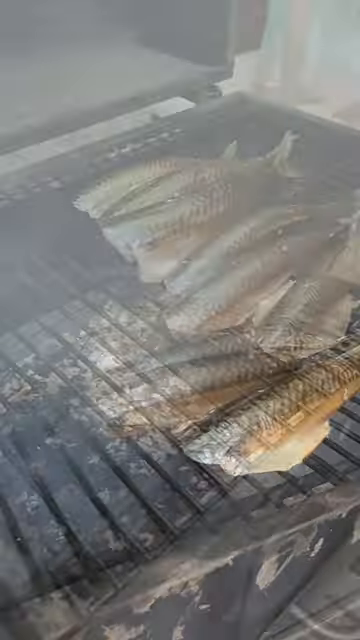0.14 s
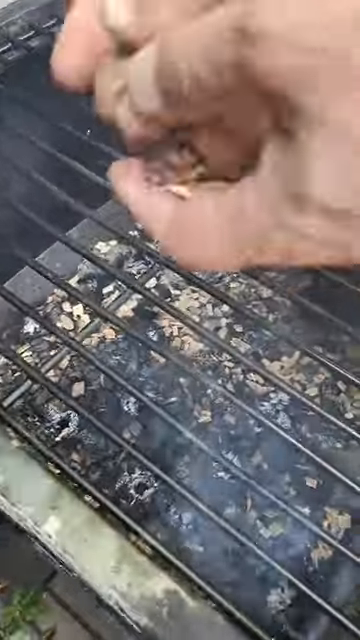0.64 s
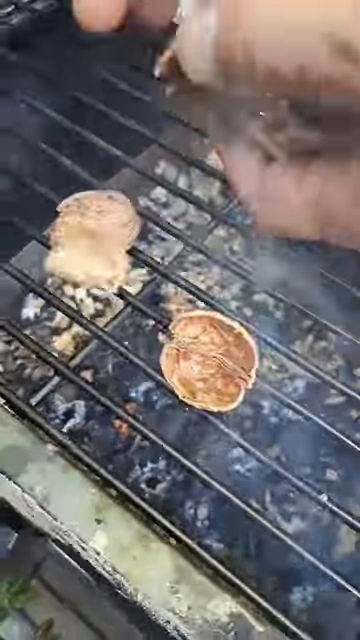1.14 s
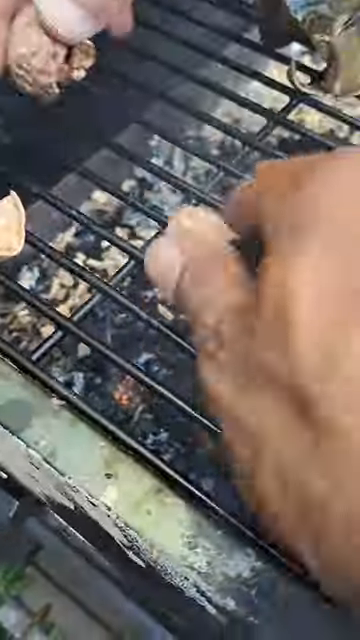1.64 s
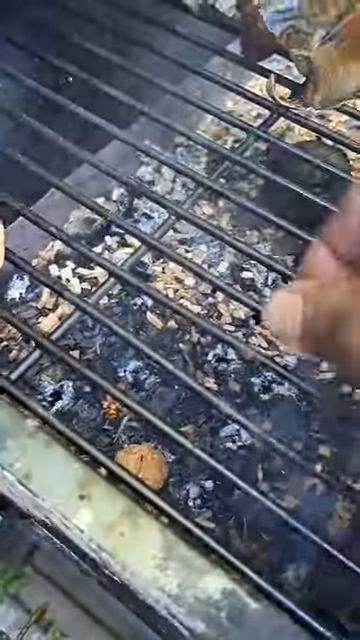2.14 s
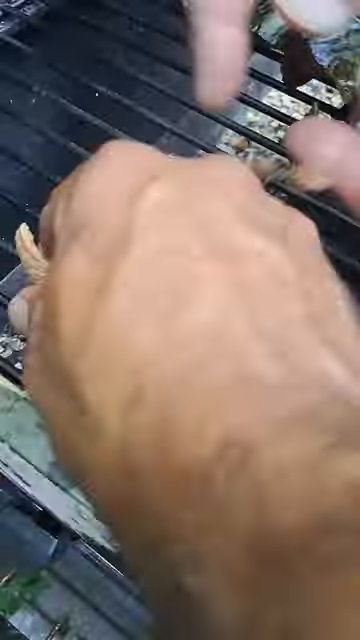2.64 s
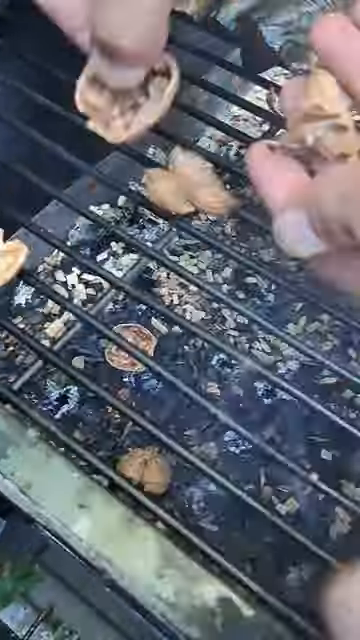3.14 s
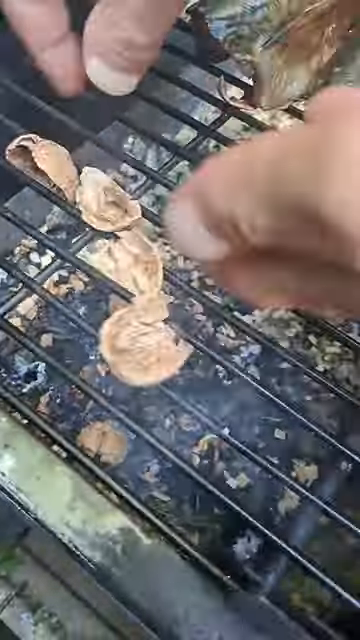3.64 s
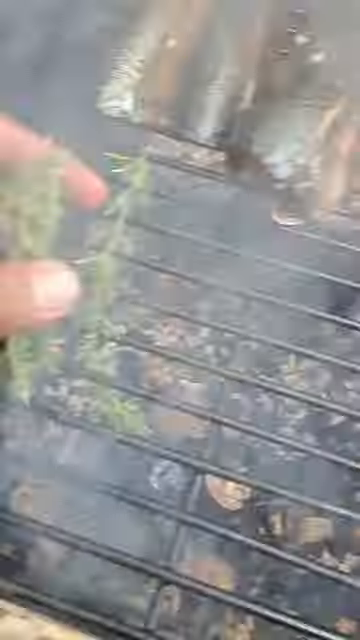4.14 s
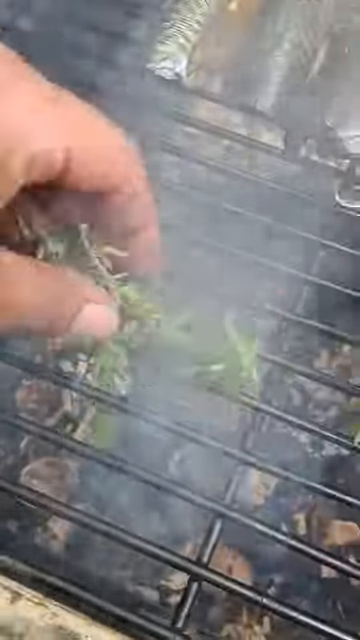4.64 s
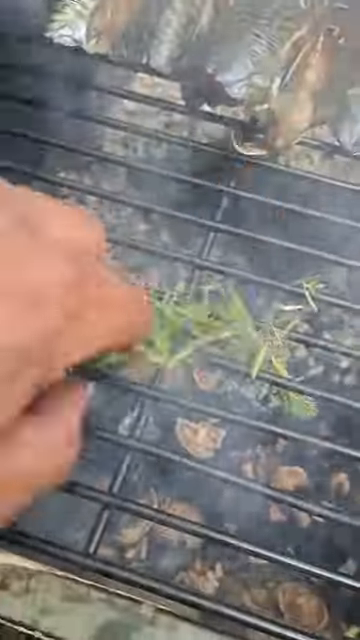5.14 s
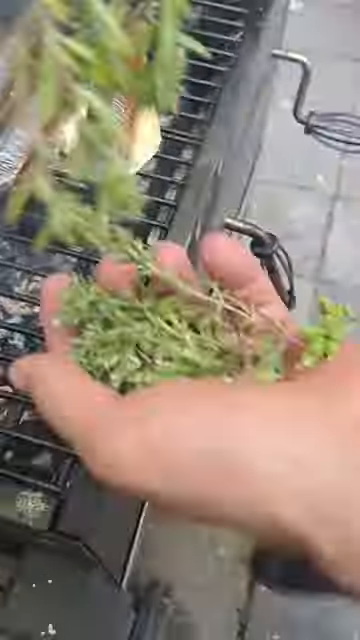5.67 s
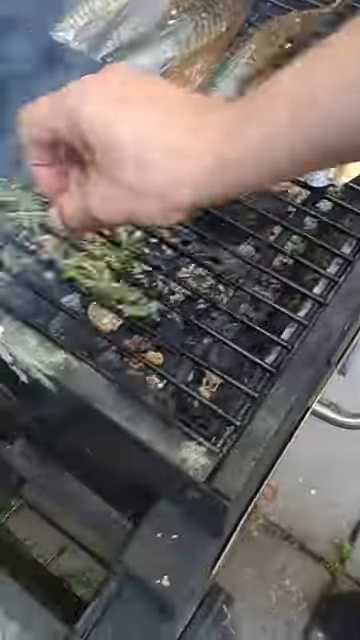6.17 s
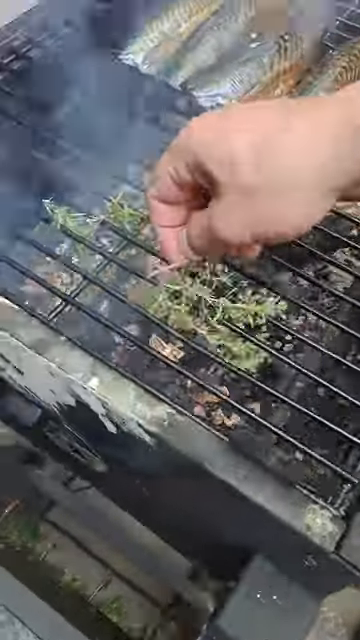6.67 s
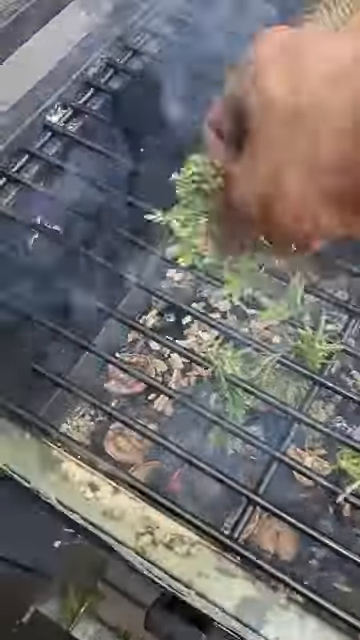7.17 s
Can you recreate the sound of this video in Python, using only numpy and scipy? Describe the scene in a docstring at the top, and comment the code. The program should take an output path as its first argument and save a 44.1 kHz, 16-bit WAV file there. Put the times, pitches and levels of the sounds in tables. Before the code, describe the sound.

Walnut shells clack and scrape sharply on a steel grill grate, with microphone bumps, then soft herb rustles over low distant traffic rumble.

```python
"""Outdoors at a smoker, hands drop and shuffle walnut shells, then herb sprigs, on the steel grate close to a phone.
Shells clack as short tones and noise puffs; friction scrapes and rustles as filtered noise; resonant bars ring.
The firebox thuds on two sines, and a finger rubs the right microphone port with pressure pulses and skin noise.
Far traffic rumbles as slowly swelling noise, and a bird chirps faintly with wavering tones."""
import sys
import numpy as np
from scipy import signal
from scipy.fft import rfft, irfft, next_fast_len
from scipy.io import wavfile
from scipy.ndimage import map_coordinates

SR = 44100
rng = np.random.default_rng(int(sys.argv[2]) if len(sys.argv) > 2 else 0)


def invert_db(x):
    """Field ratio 10**(x/20) for x, a level in decibels (scalar or array-like)."""
    u = np.asarray(x, float) / 20
    return 10 ** u


def digitize_waveform(pressure):
    """Quantize a signal to 16-bit integers and store it at the path in sys.argv[1].

    Rows of a 2-D input are taken as channels; values are limited to [-1, 1].
    """
    field = np.atleast_2d(pressure).T
    bounded = np.clip(field, -1, 1)
    quanta = np.round(bounded * 32767).astype(np.int16)
    wavfile.write(sys.argv[1], SR, quanta)


N = 321489

# Where the hands are. Each row: time in seconds, left-over-right balance of the scrape in dB
# before each layer takes its share, left-over-right balance of the rustle in dB.
HANDS = [(0, -21.5, -9), (.3, -10, 2.5), (.48, 13, 16.5), (.55, 43, 44), (1.09, 66.5, 47),
         (1.2, -10.5, 20.5), (1.36, 25, 31), (1.93, 23.5, 41), (2.2, -2, 22.5), (3.65, -6, 13),
         (4.2, -6, 1.5), (5.6, 1.5, -1.5), (6.12, -15.5, -29), (6.35, -3.5, -3), (6.8, -5, -13.5),
         (7.29, -6.5, -2)]
# The grate bars. Each row: resonance in Hz, relative level in dB, ring time in seconds.
BARS = [(760, -5, .09), (1190, -4, .09), (1690, -6, .08), (2075, 0, .11), (2320, -4, .08), (2560, -1, .1),
        (2680, -5, .07), (3700, -6, .07), (4180, -2, .09), (4440, -7, .07), (4740, -5, .07),
        (5240, -3, .07), (5560, -2, .07), (5900, -6, .06)]
# How firmly the dragged things touch the bars. Each row: time in seconds, contact in dB.
CONTACT = [(0, -8), (1.5, -10), (1.95, 10), (2.5, 10), (2.6, 6), (2.95, 8), (3.8, 8), (4.25, 6), (4.5, -8),
           (7.29, -8)]
# Colours of the friction: low drone, scrape, chafe of shells, rustle of shells.
# Each row: frequency in Hz, relative level in dB per Hz.
DRONE = [(150, -29), (250, 4), (500, 1.5), (1200, 2), (1800, -7.5), (2500, -47)]
SCRAPE = [(900, -37), (1500, -8), (2200, -4), (2800, -7), (3150, -8), (3800, -10), (5000, -35.5)]
CHAFE = [(2500, -38.5), (3300, -10.5), (3900, -2), (4900, 2.5), (5500, 2.5), (6200, -6), (7200, -25.5),
         (9000, -41.5)]
RUSTLE = [(4000, -41), (6000, -5), (7000, -2.5), (9000, -4.5), (10800, -1), (12000, -1.5), (13500, -4),
          (15500, -5.5), (16100, -31), (17500, -59.5)]


def unit(x):
    """Scaled to rms 1."""
    return x / np.sqrt(np.mean(x ** 2, -1, keepdims=True) + 1e-20)


def curves(rows, t=None):
    """Each column after the time, read at every sample or at times t."""
    s, *cols = np.transpose(rows)
    return [np.interp(np.arange(N) / SR if t is None else t, s, c) for c in cols]


def wobble(rate):
    """A smooth random curve, rate knots a second."""
    return map_coordinates(rng.standard_normal(int(N * rate / SR) + 4), [np.arange(N) * rate / SR])


def filtered(x, response):
    """x times a complex response of frequency."""
    m = next_fast_len(x.shape[-1] + 8192)
    return irfft(rfft(x, m) * response(np.fft.rfftfreq(m, 1 / SR)), m)[..., :x.shape[-1]]


def along(points):
    """(Hz, value) points as a function on a log axis."""
    f, v = np.transpose(points)
    return lambda hz: np.interp(np.log(hz + 1), np.log(f + 1), v)


def coloured(x, spectrum):
    """x through a (Hz, dB) spectrum, at rms 1."""
    return unit(filtered(x, lambda hz: invert_db(along(spectrum)(hz))))


def sides(pan_db):
    """Left and right gains that differ by pan_db and keep the summed power."""
    return 2 / np.sqrt(1 + invert_db(2 * np.array([-pan_db, pan_db])))


def pair(n, shared=0.3):
    """Noise for the two ports, part of it common to both."""
    common, *own = rng.standard_normal((3, n))
    share = np.clip(shared, 0, 1)
    return np.sqrt(share) * common + np.sqrt(1 - share) * np.array(own)


def traffic():
    """Far traffic: low rumble and higher hush swell slowly; the ports share the lows more than the highs."""
    # Traffic swell. Each row: time in seconds, rumble level in dB before the layer's trim.
    swell = [(0, -58), (.28, -69), (.5, -63.5), (.7, -52), (1.4, -53), (2.2, -55.5), (3.1, -56), (3.5, -51),
             (3.9, -59), (4.8, -56), (6.3, -54), (7.29, -58)]
    # Colours of rumble and hush. Each row: frequency in Hz, relative level in dB per Hz.
    rumble_colour = [(12, -40.5), (20, -22), (40, -7), (59, 4), (98, -14), (157, -14), (216, -16),
                     (300, -21), (390, -48.5), (660, -120)]
    hush_colour = [(88, -27), (150, -1.5), (231, -8), (264, -30), (309, -9), (383, -8.5), (888, -19),
                   (1340, -17.5), (2700, -42.5), (12400, -48), (16000, -55)]
    # Left-right likeness. Each row: frequency in Hz, likeness from 0 to 1.
    alike = [(60, 0.9), (150, 1), (380, 0.82), (950, .1), (16000, .1)]
    rumble_db, = curves(swell)
    hush_db = -60.5 + 0.56 * (rumble_db - rumble_db.mean())  # the hush follows part of the swell

    def turn(hz):
        return np.arccos(np.clip(along(alike)(hz), 0, 1)) / 2

    layers = []
    for spectrum in rumble_colour, hush_colour:
        mid, side = filtered(
            rng.standard_normal((2, N)),
            lambda hz: invert_db(along(spectrum)(hz)) * [np.cos(turn(hz)), np.sin(turn(hz))])
        layers.append(np.array([mid + side, mid - side]) / mid.std())
    rumble = invert_db(rumble_db + 5.0 + 1.2 * wobble(5.6)) * layers[0]
    hush = invert_db(hush_db - 3.5 + 0.98 * wobble(2.3) + 0.55 * wobble(19)) * layers[1]
    return (rumble + hush) * invert_db([[-1.2], [1.2]])


def bird():
    """Hoarse, distant notes: a wavering, rough line and a weaker one above, blurred by distance."""
    # Notes. Each row: start in seconds, length scale in seconds, centre pitch in Hz,
    # level in dB before the trim.
    notes = [(4.296, 0.087, 3050, -71), (4.408, 0.072, 3015, -70), (4.571, 0.11, 3180, -68.5),
             (4.669, 0.09, 3090, -72), (4.828, 0.042, 3040, -73.5), (5.165, 0.14, 3110, -66),
             (5.359, 0.037, 2530, -66)]
    t, out = np.arange(N) / SR, np.zeros((2, N))
    waver, rasp = wobble(220), invert_db(5 * wobble(250))
    for s, length, hz, db in notes:
        part = slice(round(s * SR), round((s + 3 * length) * SR))
        u = (t[part] - s) / length
        phase = 2 * np.pi * np.cumsum(hz * (1 + .035 * waver[part])) / SR
        voice = rasp[part] * (np.sin(phase) + .4 * np.sin(1.28 * phase))
        blur = [(.85 * hz, -40), (.97 * hz, 0), (1.12 * hz, -9), (1.28 * hz, -5), (1.45 * hz, -40)]
        far = 1.035 * coloured(rng.standard_normal((2, len(u))), blur)
        envelope = np.minimum(4.0 * u, 1) * np.exp(-u ** 3)
        out[:, part] += invert_db(db - 3.5) * (0.73 * voice + far) * envelope
    return out * invert_db([[0.1], [4.5]])


def finger():
    """Pressure builds in the right port, lets go, overshoots for a moment and leaks away; skin squeaks."""
    # Presses. Each row: release time in seconds, level in dB before the trim,
    # press time constant in ms, release time constant in ms.
    presses = [(0.558, -33, 1.7, 1.1), (0.5872, -32, 0.84, 1.6), (0.689, -32, 2.3, 4),
               (0.7236, -27.5, 2.8, 3.5), (0.7364, -27, 0.96, 2.2), (0.796, -32, 3.1, 3.3),
               (0.8307, -32, 1.4, 1.4), (0.936, -28, 1.6, 1.8), (.953, -31, 3.4, 1.4),
               (1.1404, -29, 11, 0.97), (1.1464, -20, 0.68, 2), (1.1614, -18.5, 0.5, 0.69),
               (1.182, -21.5, 0.29, 0.24), (1.1888, -19.5, 4.8, 1.31), (1.1988, -15.5, 0.17, 0.12),
               (1.2011, -18, 0.84, 0.121), (1.212, -13.5, 0.14, 0.1), (1.2524, -9.5, 2.8, .15),
               (1.2843, -25, 0.51, 0.8), (1.2914, -33, 3.3, 2.2), (1.5885, -24.5, 1.9, 1.9)]
    # Skin on the port. Each row: time in seconds, level in dB.
    squeak_level = [(1.13, -87.5), (1.145, -45), (1.19, -29.5), (1.205, -29.5), (1.225, -46.5), (1.24, -37),
                    (1.27, -32), (1.3, -72)]
    # Colour of the skin. Each row: frequency in Hz, relative level in dB per Hz.
    skin = [(30, -3.5), (100, -3), (400, -4), (1500, -17), (3000, -34), (7000, -46), (16000, -56)]
    ms = np.arange(N) / SR * 1000
    push = np.zeros(N)
    for s, db, press, release in presses:
        near = slice(round(s * SR) - 2000, round(s * SR) + 2000)
        u = ms[near] - s * 1000
        shape = np.exp(-np.where(u < 0, -u / press, u / release) ** 1.6)
        overshoot = .2 * (u > 0) * (1 - shape) * np.exp(-(u / (4 * press)) ** 4)
        push[near] += invert_db(db + 2.5) * (overshoot - shape)
    push = filtered(push, lambda f: 1j * f / (12 + 1j * f))  # pressure leaks away below 12 Hz
    gritty = invert_db(5.7 * wobble(160)) * rng.standard_normal(N)
    squeak = invert_db(curves(squeak_level)[0]) * coloured(gritty, skin)
    return (push + squeak) * invert_db([[-32], [0]])


def thuds():
    """The sheet-steel firebox booms on a low mode and an overtone near three times its pitch."""
    # Thuds. Each row: start in seconds, level in dB, pitch in Hz, 60 dB decay in seconds,
    # overtone in dB relative to the low mode.
    booms = [(0.156, -35.5, 168, 0.032, -14), (1.419, -30, 203.8, 0.12, -10),
             (2.064, -29.5, 479, 0.027, -21), (2.416, -40, 222, 0.13, -26), (3.172, -38.5, 232, 0.18, -1.5),
             (3.603, -38, 200, 0.19, -7), (4.108, -32.5, 220.4, 0.095, -26)]
    t, out = np.arange(N) / SR, np.zeros(N)
    for s, db, hz, t60, over_db in booms:
        u = np.clip(t - s, 0, None)
        boom = np.sin(2 * np.pi * hz * u) + invert_db(over_db) * np.sin(2 * np.pi * 3.05 * hz * u)
        out += invert_db(db - 60 * u / t60) * (1 - np.exp(-u / 0.0026)) * boom
    return out


def strokes(rows, slopes, bright, weight, fall):
    """Power of a layer every ms: each stroke rises, holds with a slight sag and falls in dB."""
    s, hold, force_db, bright_db, weight_db = np.transpose(rows)[..., None]
    ms = np.arange(N * 1000 // SR + 1) - s * 1000
    late = np.clip(ms - hold * 1000, 0, None)
    rise_db = slopes[0] * np.clip(-ms, 0, None)
    fall_db = fall * slopes[1] * late
    sag_db = 2 * np.clip(ms / (hold * 1000), 0, 1)  # force lost while the stroke holds
    db = force_db + bright * bright_db + weight * weight_db - rise_db - fall_db - sag_db
    return np.sum(invert_db(2 * db), 0)


def effort(bright, weight, fall):
    """Gain of one friction layer, from its shares of brightness and weight: drags, brushes and fidgeting."""
    # Shells dragged and tumbled, then sprigs brushed over the bars. Each row: start of the hold
    # in seconds, hold in seconds, force in dB, brightness in dB, weight in dB.
    drags = [(.095, 0.054, -57, -22, -1), (.535, .018, -52.5, 5.5, -3), (.605, 0.007, -44, -2, -5),
             (.68, 0.0081, -53, -18, -17.5), (.744, .04, -60.5, 0.5, -23), (.79, 0.059, -63, -2, -10.5),
             (.846, .005, -56, 0, -13.5), (.88, 0.02, -35.5, -5, 1), (.924, 0.026, -37, -11.5, 0),
             (.975, 0.017, -50, -3, 6), (1.016, 0.0051, -51, -1, 17.5), (1.065, 0.017, -60, 7, -2),
             (1.157, 0.0061, -48, 5.5, 10), (1.2, 0.0083, -36, -26, 2), (1.235, 0.0073, -35.5, -18.5, -3),
             (1.42, 0.01, -64.5, -1.5, 5.5), (1.54, 0.033, -44.5, -20, -1), (1.745, 0.11, -66, -4.5, 13.5),
             (1.995, 0.013, -52.5, -8, 3.5), (2.066, 0.0093, -61, 3, 11), (2.112, .005, -76, 22, 7),
             (2.41, 0.017, -49.5, -18.5, 0.5), (2.484, 0.012, -71, 22.5, 21.5),
             (2.56, 0.17, -66, -6.5, -10), (2.65, 0.004, -53, -3.5, 5.5), (2.762, 0.031, -54.5, -9, 6.5),
             (2.84, 0.0045, -57.5, 6.5, 5.5), (2.885, 0.0086, -72, -7, 16.5), (2.953, 0.004, -60, -3, 2),
             (2.975, .08, -44, -16.5, 2.5), (3.08, .025, -57.5, 3, 5), (3.128, 0.0054, -62, -8, 6.5),
             (3.172, 0.02, -36.5, -9.5, -2), (3.215, 0.0432, -44.5, -5.5, 7),
             (3.3, 0.0043, -39.5, -33.5, 2.5), (3.354, 0.0035, -58.5, 12, 15.5),
             (3.396, 0.01, -43, -3.5, 1), (3.48, 0.05, -45.5, -6, 3.5), (3.54, 0.012, -54, -17.5, -1),
             (3.588, 0.028, -35, -3, 1.5), (3.685, .015, -50, -15.5, 4.5), (3.787, 0.011, -50, 3, 1.5),
             (3.93, 0.024, -65.5, -2, 8.5), (3.995, 0.005, -65.5, -9, 4), (4.1, 0.045, -58, -19, 5.5),
             (4.22, 0.0102, -64, -6.5, 9.5)]
    brushes = [(4.35, .02, -73.5, 2, 6), (4.52, .008, -85, 15, 14), (4.64, 0.016, -74.5, 9, 15.5),
               (4.89, 0.033, -80, 17.5, 12), (5.095, 0.011, -76, 13, 8), (5.31, 0.016, -61.5, -7, 8),
               (5.42, 0.015, -80, 4, 18), (5.52, 0.025, -79, 18.5, 21), (5.585, 0.018, -79, 14, 17),
               (5.8, 0.057, -53.5, -3, 4), (6.085, 0.069, -64, 19, 10), (6.2, 0.042, -71.5, 21, 13.5),
               (6.375, 0.011, -64.5, -1, 9.5), (6.58, 0.025, -85, 18, 24.5), (6.69, 0.019, -71, 15, 13.5),
               (6.795, 0.0068, -65, 3, 12), (6.88, 0.012, -95, 19, 21.5), (6.96, 0.021, -73, 12, 8),
               (7.055, .015, -74.5, 1, 18), (7.18, 0.096, -73, 15, 11.5)]
    # Slopes of a stroke: rise in dB per ms, fall in dB per ms before the layer's fall factor.
    drag_slopes = (2.5, 0.62)
    brush_slopes = (0.77, 0.38)
    # Hands never quite still. Each row: time in seconds, force in dB, brightness in dB.
    fidget = [(0, -66, -20), (.2, -68, -13), (.46, -67.5, -10), (.52, -74, -1), (.6, -55.5, -11.5),
              (1.08, -77.5, 4), (1.3, -79, -0.5), (1.72, -86, 7), (1.9, -72.5, 5.5), (2.15, -83, 6),
              (2.38, -91, 10.5), (2.52, -69, -7.5), (2.7, -66.5, -11), (2.9, -71.5, 0), (3.3, -64, -9),
              (3.9, -69.5, -8.5), (4.3, -76.5, 0), (5.0, -81, 5), (5.5, -77.5, 10), (5.72, -86.5, 4),
              (6.0, -76, 1.5), (6.5, -79, 3.5), (6.7, -80.5, 21.5), (7.29, -73.5, -6.5)]
    power = strokes(drags, drag_slopes, bright, weight, fall)
    power = power + strokes(brushes, brush_slopes, bright, weight, fall)
    force_db, bright_db = curves(fidget)
    weight_db = 14 - 0.87 * (force_db + 80)  # lighter fidgeting sounds relatively heavier
    idle_db = force_db + bright * bright_db + weight * weight_db
    idle_db = idle_db + 2.5 * wobble(19) + 1.9 * wobble(40)
    stroke_power = np.interp(np.arange(N) / SR * 1000, np.arange(len(power)), power)
    return np.sqrt(stroke_power + invert_db(2 * idle_db))


def rubbing():
    """Gritty friction: scrape, brighter chafe, low drone and rustle; the first three set the bars ringing."""
    # Rustle of the leaves. Each row: frequency in Hz, relative level in dB per Hz.
    leaves = [(3200, -35), (4300, -12.5), (6000, -9.5), (8000, -5), (10000, -9), (12000, -1), (14000, -6.5),
              (15600, -2.5), (16100, -37), (17500, -64)]
    scrape_pan, rustle_pan = curves(HANDS)

    def grit(rough_db, rate):
        return invert_db(rough_db * wobble(rate)) * pair(N)

    rough = grit(rough_db=2.5, rate=210)
    scrape = invert_db(-2.5) * effort(0, 0, 0.98) * coloured(rough, SCRAPE) * sides(0.56 * scrape_pan)
    # the chafe follows part of the brightness
    chafe = invert_db(-2 - 5.5) * effort(0.29, 0, 0.97) * coloured(rough, CHAFE) * sides(scrape_pan)
    # the drone dies slower than the scrape, the rustle faster
    low_grit = coloured(grit(rough_db=1.5, rate=82), DRONE)
    drone = invert_db(-4.5) * effort(0, 1, 0.58) * low_grit * sides(0.063 * scrape_pan)
    crisp = grit(rough_db=3.5, rate=300)
    herbs = np.arange(N) > 4 * SR  # sprigs follow the shells
    rustle_noise = np.where(herbs, coloured(crisp, leaves), coloured(crisp, RUSTLE))
    rustle = effort(0.78, 0, 2.1) * rustle_noise * sides(rustle_pan)

    def bar_response(f):
        return sum(invert_db(db) * 1j * f * 4 / t60 / (c * c - f * f + 1j * f * 4 / t60) for c, db, t60 in BARS)

    drag = scrape + chafe + drone
    return drag + filtered(drag * invert_db(curves(CONTACT)[0]), bar_response) + rustle


def clacks():
    """Each contact: a short shell ring, a puff of broad and of bright noise, and the bars at new strengths."""
    # Shell contacts. Each row: start in seconds, level in dB before the trim, shell pitch in Hz,
    # relative treble in dB, decay in ms that each part scales.
    contacts = [(.3087, -44.5, 2390, -20, 46), (0.3744, -43.5, 4100, -20, 23), (.4461, -36, 1370, -47, 41),
                (0.4805, -44, 1340, -42, 110), (0.5364, -44.5, 5800, 6, 35), (0.607, -28.5, 2630, -15, 30),
                (0.6761, -28, 2550, -19.5, 35), (.7078, -38, 3670, -6.5, 39),
                (.7492, -27, 4470, -19.5, 49.6), (0.7999, -46.5, 4100, -1.5, 35),
                (0.8758, -19.5, 4900, -8, 30), (0.8804, -5.5, 4550, -14.5, 47), (0.931, -19, 2600, -16, 42),
                (0.976, -34.5, 4500, -9, 42), (1.0155, -22.5, 1180, -14, 38), (1.0432, -29.5, 6860, -7, 21),
                (1.0557, -37, 3550, -6.5, 40), (1.1072, -48.5, 1450, -3.5, 43),
                (1.1542, -22.5, 1390, -8.5, 65), (1.2028, -19, 1416, -9, 23),
                (1.2331, -23.5, 2180, -3.5, 35), (1.2485, -30, 6000, -7, 25),
                (1.266, -36, 1820, -14.5, 36.1), (1.2785, -50, 1280, -7, 32), (1.419, -49, 3540, -24, 54),
                (1.493, -56, 8400, -5, 27), (1.541, -45, 2120, -33, 18.94), (1.7716, -49, 1950, -1.5, 60),
                (1.9884, -42, 4430, -11, 42), (1.996, -37.5, 3900, -24, 73), (2.0016, -50, 2500, -24, 70),
                (2.0664, -30.5, 1770, -6.5, 59), (2.1094, -46.5, 4970, -4, 38), (2.408, -57, 4100, -10, 36),
                (2.423, -45.5, 2500, -30.5, 46), (2.4815, -38.5, 4060, -17, 53),
                (2.5636, -45.5, 4660, -3, 37), (2.6297, -33, 2770, -17, 25), (2.6552, -41, 2660, -1.5, 60),
                (2.699, -50, 1910, -3, 28), (2.7579, -36, 4770, -9, 52), (2.7945, -37, 3860, -12.5, 35),
                (2.875, -44, 5040, -32, 82), (2.895, -39, 5200, -33, 55), (2.9702, -33, 2070, -30.5, 38),
                (2.9864, -23, 2230, -14, 22), (3.0023, -18.5, 2170, -16.5, 23),
                (3.07, -31.5, 5500, -17, 82), (3.097, -31, 4300, -15.5, 32), (3.1283, -38.5, 4200, -13, 43),
                (3.183, -24, 5000, -18, 27), (3.2067, -7.5, 5640, -23.5, 65),
                (3.2193, -16.5, 5400, -15.5, 51), (3.243, -7.5, 5720, -10.5, 19),
                (3.2932, -18.5, 1193, -26.5, 46), (3.3538, -16.5, 4470, -11, 46),
                (3.396, -9.5, 5400, -13.5, 58), (3.4503, -31, 2680, -7, 20), (3.5047, -25, 5540, -12.5, 79),
                (3.5605, -33, 3560, 0, 18), (3.5836, -23.5, 6270, -8.5, 41), (3.6024, -10, 2210, -10, 25),
                (3.597, -18, 11700, -14, 41), (3.6035, -14.5, 12220, -13.5, 42),
                (3.664, -29.5, 5780, -11.5, 23), (3.679, -32, 2150, -14, 41), (3.787, -32, 5720, -12, 48),
                (3.8172, -33.5, 5470, -9, 55), (3.926, -39, 10800, -10.5, 45),
                (4.132, -37.5, 2340, -18, 65), (4.221, -43.5, 1200, -13, 38.8), (4.6379, -58, 1283, -1, 43),
                (5.3193, -54, 1230, -34, 25), (5.528, -54, 1243, 6, 21), (6.239, -44.5, 6450, -12, 45),
                (7.005, -45, 1410, -16, 32)]
    out, ms = np.zeros((2, N + SR)), np.arange(SR // 5) / SR * 1000
    draws = rng.standard_normal((len(contacts), len(BARS) + 2))

    def dying(t60_ms):
        return invert_db(-60 * ms / np.clip(t60_ms, 3, 900)) * (1 - np.exp(-ms / 0.69))

    def tone(hz):
        return np.sin(2 * np.pi * hz * ms / 1000)

    def noise(spectrum):
        return coloured(pair(len(ms)), spectrum)

    for (s, db, hz, treble_db, decay), draw in zip(contacts, draws):
        body_pan, treble_pan = curves(HANDS, s)
        shell_pan = body_pan if hz < 8000 else treble_pan  # the highest take the balance of the rustle
        # shells held off the grate, or cracked on each other, barely ring it
        touch_db = -30.5 + 0.3 * curves(CONTACT, s)[0] - .25 * (db + 30)
        close = sum(tone(hz * (1 + .02 * d)) for d in draw[-2:]) * dying(.9 * decay)
        clear = np.clip(max(hz / 4500, -treble_db / 24), .3, 1.2)  # high or hissless ones ring clearest
        shell = clear * (.8 * tone(hz) * dying(.4 * decay) + .3 * close)
        puff = (0.16 * noise(SCRAPE) + 0.34 * noise(CHAFE)) * dying(1.2 * decay)
        puff = puff * invert_db(0.45 * min(treble_db + 17, 0))
        tick = invert_db(treble_db + 9) * noise(RUSTLE) * (dying(.35 * decay) + .1 * dying(1.3 * decay))
        thump = invert_db(-31.0) * noise(DRONE) * dying(1.5 * decay)
        ring = sum(invert_db(touch_db + level + 5.5 * d) * tone(c) * dying(t60 * 1000)
                   for (c, level, t60), d in zip(BARS, draw))
        hit = shell * sides(shell_pan)[:, None] + (puff + ring) * sides(body_pan)[:, None]
        hit = hit + tick * sides(treble_pan)[:, None] + thump * sides(0.18 * body_pan)[:, None]
        out[:, round(s * SR):][:, :len(ms)] += invert_db(db - 5.5) * hit
    return out[:, :N]


def hands(x):
    """The port nearer to the hands hears them a little earlier: the right one is shifted against the left."""
    # Earliest and latest shift of the right port in seconds.
    lead_range = (-.0003, .00047)
    lead = np.clip(.00005 * curves(HANDS)[1], *lead_range) * SR  # 0.05 ms for each dB of balance
    return np.array([x[0], map_coordinates(x[1], [np.arange(N) - lead])])


def scene():
    """Everything at the two ports."""
    return traffic() + bird() + finger() + thuds() + hands(rubbing() + clacks())


def top_cut(x):
    """Nothing passes above the cut-off."""
    return signal.sosfilt(signal.butter(12, 16990, fs=SR, output="sos"), x)


def record(dry):
    """The phone keeps nothing above its band limit of 16.7 kHz."""
    band_limited = filtered(dry, lambda hz: hz < 16700)
    return top_cut(band_limited)


dry = scene()
out = record(dry)
digitize_waveform(out)
```